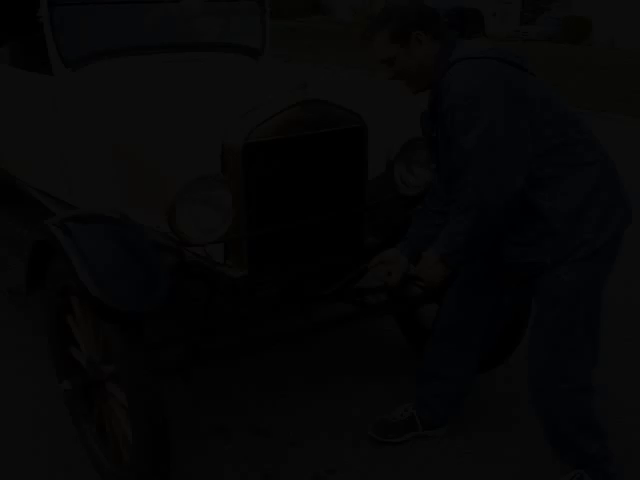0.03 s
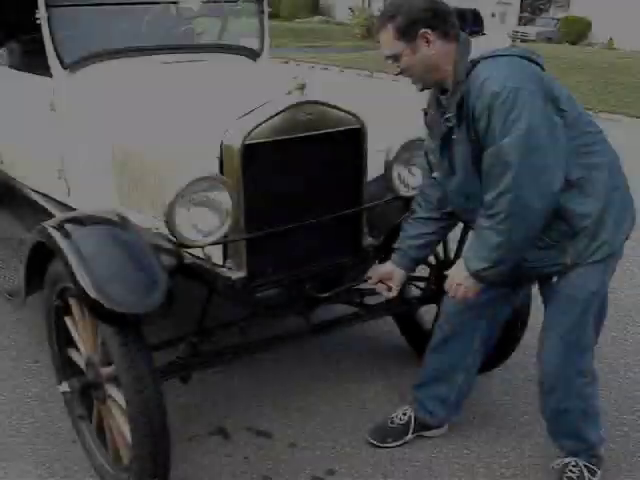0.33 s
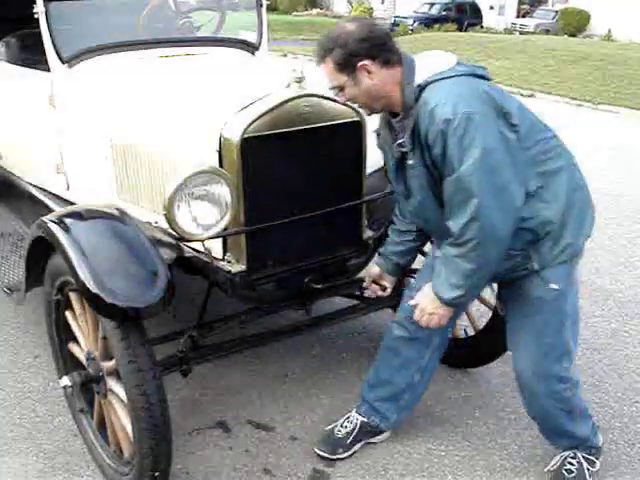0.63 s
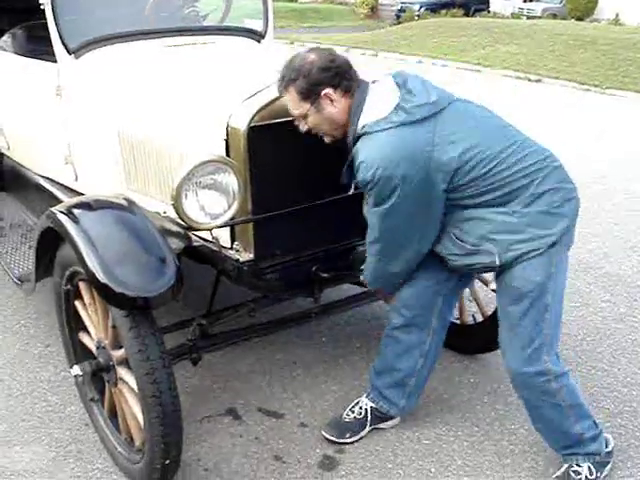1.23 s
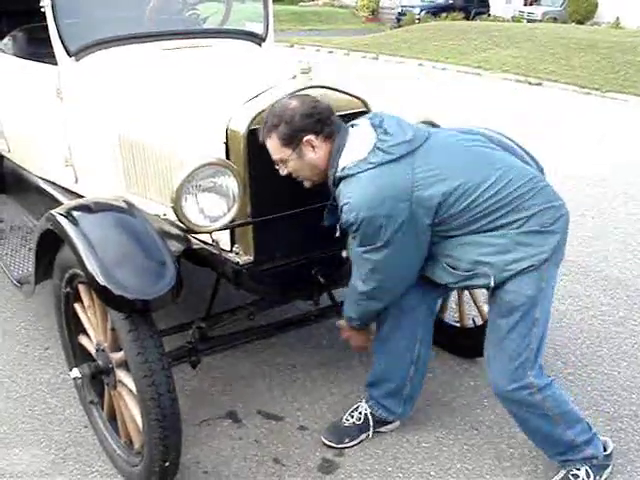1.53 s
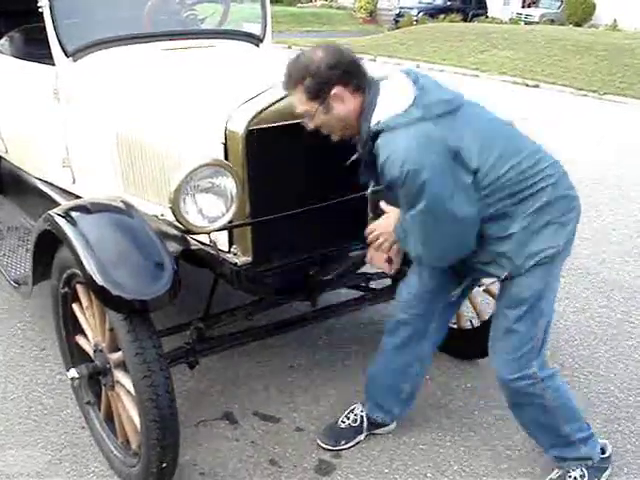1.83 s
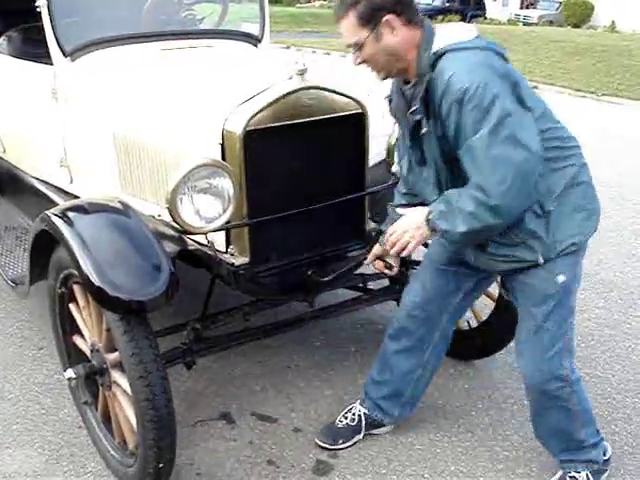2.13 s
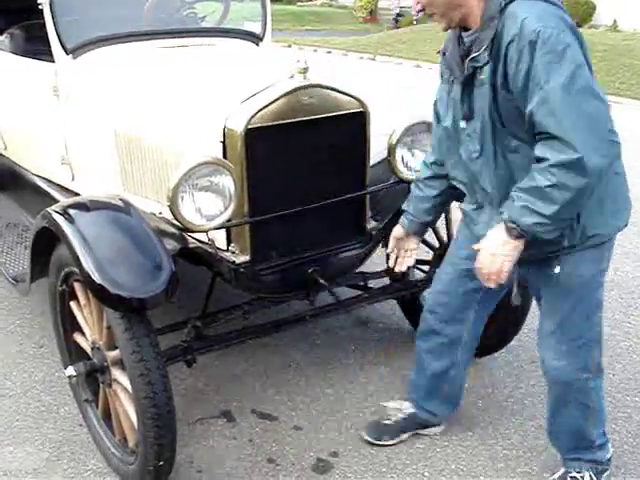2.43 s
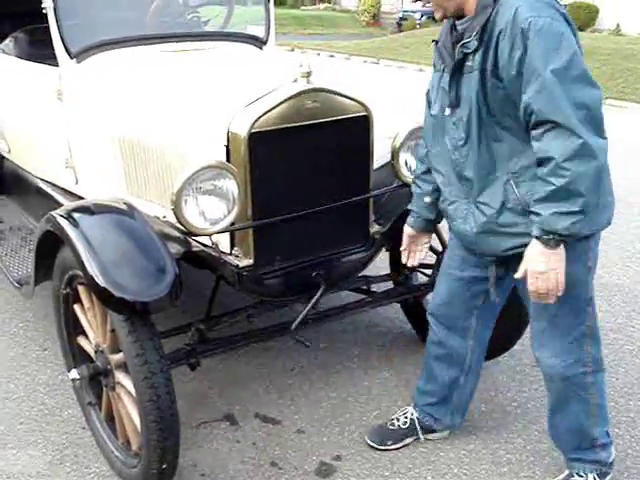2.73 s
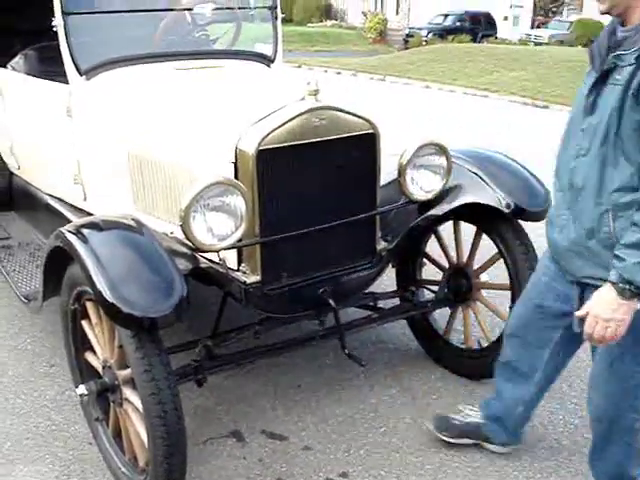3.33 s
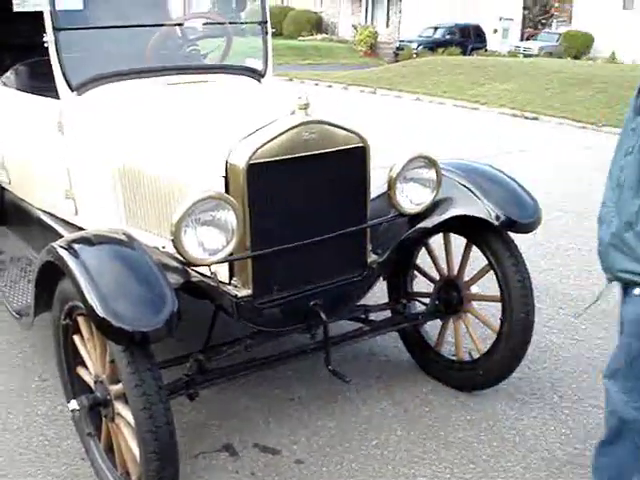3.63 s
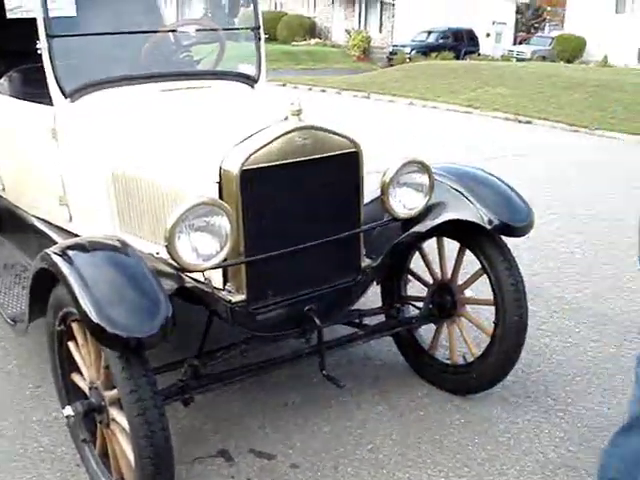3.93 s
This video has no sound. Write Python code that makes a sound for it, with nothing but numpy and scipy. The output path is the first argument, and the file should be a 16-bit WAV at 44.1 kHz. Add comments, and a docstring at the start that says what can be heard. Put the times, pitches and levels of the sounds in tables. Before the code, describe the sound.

An old car engine is hand cranked and starts a few metres away. The handle rattles, clunking at about 0.5 and 1 second. Near 1.6 seconds the shaft squeals and scrapes as the engine churns over. It catches with two sharp spits around 2.2 seconds, chirps near 2.7, and quickens into a dense tinny clatter with chuffing exhaust until 4 seconds. Faint distant traffic and hiss lie underneath.

```python
"""A quiet street: an antique four-cylinder car is hand cranked a few metres away.
The crank rattles into its socket and clunks against the frame; on the pull the dry shaft squeals
and gears and pistons churn over. The engine catches with two sharp spits, fires unevenly, then gathers
speed in a dense tinny clatter, each firing ringing the bonnet and chuffing from the exhaust.
Distant traffic and a faint hiss lie underneath."""
import sys
import numpy as np
from scipy import signal
from scipy.fft import rfft, irfft, next_fast_len
from scipy.io import wavfile
from scipy.ndimage import map_coordinates

SR = 44100
rng = np.random.default_rng(int(sys.argv[2]) if len(sys.argv) > 2 else 0)


def dump(signal):
    """Clip the signal to [-1, 1] and save it as 16-bit WAV at the path in sys.argv[1]."""
    limited = np.clip(np.atleast_2d(signal).T, -1, 1)
    pcm = np.round(limited * 32767).astype(np.int16)
    wavfile.write(sys.argv[1], SR, pcm)


N = 4 * SR

# resonances of block and bonnet: centre_hz, width_hz, lift_db
METAL_PEAKS = [(280, 45, 3), (650, 60, 6), (820, 50, 3), (960, 40, 3), (1090, 35, 4), (1552, 70, 5.5),
               (1720, 90, 3.5), (2434, 50, 4), (3554, 70, 5), (4016, 70, 4.5), (5642, 80, 4.5),
               (7037, 70, 5)]


def firings():
    """Each firing shakes out tinny clatter, rings the bonnet and chuffs from the exhaust."""
    # uneven at first, then closer: start_s, level_db, length_s
    kicks = [(1.669, -29.5, 0.0072), (1.837, -31.5, .021), (1.933, -25, .007), (2.04, -23, 0.019),
             (2.156, -19, 0.039), (2.263, -22.5, .034), (2.386, -32.5, 0.021), (2.473, -22, .028),
             (2.571, -20.5, 0.028), (2.657, -20.5, 0.021), (2.729, -30.5, .014), (2.803, -22.5, 0.024),
             (2.862, -22, 0.033), (2.918, -23, 0.029), (2.984, -24.5, .014), (3.033, -22, 0.026),
             (3.082, -21.5, 0.034), (3.151, -28, .021), (3.193, -20.5, 0.029), (3.238, -21, 0.018),
             (3.285, -23, .025), (3.33, -19.5, 0.018), (3.373, -27.5, .018), (3.414, -23, .016),
             (3.453, -23.5, 0.031), (3.498, -22, .018), (3.535, -24.5, .013), (3.574, -21, 0.024),
             (3.613, -23, 0.021), (3.653, -22.5, 0.012), (3.682, -22, 0.018), (3.72, -21.5, 0.019),
             (3.757, -19, 0.022), (3.796, -21.5, 0.019), (3.832, -24, .014), (3.87, -21, 0.02),
             (3.901, -22, 0.021), (3.94, -20, 0.015), (3.974, -23, 0.014)]
    # spectra: freq_hz, level_db
    clatter_spectrum = [(88, -45.5), (150, -10.5), (302, -9), (490, -18.5), (631, -4.5), (1090, -4),
                        (1340, -4), (2020, -7), (2310, -4), (3410, -6.5), (4650, -12.5), (7130, -14.5),
                        (12000, -29), (15500, -25)]
    exhaust_spectrum = [(30, -6.5), (80, -2.5), (115, 10), (150, 5.5), (270, 2), (400, 8), (700, -5.5),
                        (2000, -67)]
    bonnet_db, bonnet_t60_s = -9, 0.16
    exhaust_db, exhaust_lag_s = -12.5, 0.0075

    shake = bursts(kicks, rise_s=0.0015, t60_s=0.075) * amp(1.15 * wobble(170))
    clatter = shake * coloured(taps(per_s=1100, wash_db=2.5), clatter_spectrum, METAL_PEAKS)
    modes = [(hz, along(clatter_spectrum, hz) + lift_db, bonnet_t60_s) for hz, _, lift_db in METAL_PEAKS]
    bonnet = sum(ring(modes, s + length_s / 2, db + bonnet_db, rise_s=0.009) for s, db, length_s in kicks)
    chuffs = [(s + exhaust_lag_s, db + exhaust_db, length_s / 2) for s, db, length_s in kicks]
    exhaust = bursts(chuffs, rise_s=0.0037, t60_s=0.12) * coloured(noise(), exhaust_spectrum)
    return clatter + bonnet + exhaust


def churn():
    """Gears, valves and pistons rumble and tick while the shaft turns."""
    # time_s, bass_db, mid_db, treble_db
    levels = [(1.2, -88, -90, -90), (1.35, -71, -53, -66), (1.58, -74, -56, -57), (1.64, -51, -40, -47),
              (1.72, -44, -39, -43), (1.78, -38, -36.5, -36), (1.85, -38.5, -34.5, -27.5),
              (1.915, -36, -36, -35), (1.94, -27, -23, -33.5), (1.99, -28, -22, -24.5),
              (2.06, -27, -26, -27), (2.11, -32, -29, -30.5), (2.23, -31.5, -28.5, -28.5),
              (2.34, -51, -33.5, -31.5), (2.42, -35, -30, -31.5), (2.77, -35.5, -29.5, -29.5),
              (3.15, -39, -29.5, -29.5), (3.55, -34, -24.5, -25), (4, -32.5, -24.5, -26.5)]
    # spectra: freq_hz, level_db
    bass_spectrum = [(30, -29), (80, -10.5), (120, -9), (200, -2.5), (270, 1), (430, 3), (540, -0.5),
                     (800, -12.5), (2000, -72)]
    mid_spectrum = [(60, -48), (300, -13.5), (520, -8.5), (640, -3), (820, 1.5), (1150, -3.5), (1600, -4.5),
                    (2200, -18.5), (4000, -41), (12000, -88)]
    treble_spectrum = [(500, -57), (1500, 1), (2400, 3.5), (3600, -0.5), (5500, -3), (8000, -9.5),
                       (10000, -15), (12000, -22), (15500, -13)]

    bass_db, mid_db, treble_db = curves(levels)
    bass = amp(bass_db + 1.8 * wobble(50)) * coloured(noise(), bass_spectrum, METAL_PEAKS)
    mid = amp(mid_db + wobble(70)) * coloured(taps(per_s=900, wash_db=4), mid_spectrum, METAL_PEAKS)
    treble_gain = amp(treble_db + 1.33 * wobble(110))
    treble = treble_gain * coloured(taps(per_s=800, wash_db=1.5), treble_spectrum, METAL_PEAKS)
    return bass + mid + treble


def snaps():
    """Bright cracks of steel on steel, from the crank claw and the hardest kicks."""
    # start_s, level_db, length_s
    hits = [(.3, -48.5, 0.024), (.333, -43, .011), (.473, -48, 0.008), (.51, -32.5, 0.0063),
            (.537, -31, 0.01), (.725, -51, .008), (.966, -36, .0044), (1.189, -45.5, .008),
            (2.155, -18, 0.0053), (2.178, -22.5, 0.0091), (2.265, -18, 0.0067), (2.288, -22.5, 0.0071),
            (2.574, -24.5, .006), (2.802, -22.5, .01), (2.923, -20, 0.0081), (3.191, -19.5, 0.0061),
            (3.333, -26, 0.0056), (3.508, -24.5, .005)]
    # freq_hz, level_db
    spectrum = [(300, -17), (1200, -9.5), (2200, 1), (3400, 0), (5000, -3.5), (7500, -7.5), (9500, -13.5),
                (11500, -38), (15500, -17)]
    envelope = bursts(hits, rise_s=0.00039, t60_s=0.043)
    return envelope * coloured(taps(per_s=4800, wash_db=4), spectrum, METAL_PEAKS)


def spits():
    """The hardest jolts each push one slow wave of air: pressure, then suction."""
    # start_s, level_db, push_s
    jolts = [(2.157, -22, .04), (2.266, -24, .045), (2.577, -37, .035), (.966, -42, .006),
             (.537, -46, .008)]
    rise_s = 0.0025
    out = np.zeros(N)
    for start_s, db, push_s in jolts:
        t = np.maximum(clock() - start_s, 0)
        attack = 1 - np.exp(-t / rise_s)
        out += amp(db) * attack * (1 - t / push_s) * np.exp(-t / push_s)
    return out


def crank():
    """The loose handle rattles; its knocks crack, ring the frame and boom in the bodywork."""
    # blows on the frame: start_s, level_db, rise_s, crack_offset_db, favoured_hz
    knocks = [(0.506, -32.5, 0.012, -8, 1090), (.542, -27, 0.023, 2, 420), (.585, -38.5, 0.004, -4, 633),
              (.845, -38.5, 0.0026, -4.5, 450), (0.967, -26, 0.0056, 7, 366), (1.192, -49, 0.0046, -7, 985),
              (1.225, -43, 0.0036, -14, 715)]
    # pitch_hz, level_db, t60_s
    frame_modes = [(258, -6, .22), (361, -3, .25), (420, -2, .27), (530, -9, .15), (635, -3, .2),
                   (715, -7, .18), (910, -6, .15), (985, -6, .15), (1090, -5, .15), (1211, -4, .17),
                   (1486, -11, .15), (1690, -8, .12)]
    # start_s, level_db, length_s
    rattles = [(.166, -42, 0.054), (.249, -46, 0.035), (.3, -50.5, 0.055), (.397, -43.5, 0.011),
               (.425, -42, 0.016), (.472, -46, 0.045), (.502, -35, 0.039), (.537, -31.5, 0.032),
               (.725, -44.5, 0.046), (1.005, -35.5, 0.0048), (1.19, -39, 0.016), (1.215, -43.5, 0.031),
               (1.47, -48.5, 0.026)]
    # spectra: freq_hz, level_db
    boom_spectrum = [(100, -21), (375, 1.5), (520, -7), (640, -3.5), (1200, -12), (2000, -43)]
    rattle_spectrum = [(120, -26), (200, -7.5), (585, -9.5), (1090, -3), (1450, -13.5), (1680, -8),
                       (2020, -10), (3680, -16), (11800, -36.5), (15500, -30)]
    crack_spectrum = [(60, -1.5), (150, -20), (350, -6), (700, 2.5), (1150, -10), (1380, -5), (2000, -2),
                      (3000, -8.5), (5500, -22), (9000, -34), (15500, -23)]

    frame = sum(ring(frame_modes, s, db - 1, rise_s, hz) for s, db, rise_s, _, hz in knocks)
    boom = bursts([(s, db, 0) for s, db, *_ in knocks], rise_s=0.012, t60_s=0.24)
    boom *= coloured(noise(), boom_spectrum)
    rattle = bursts(rattles, rise_s=0.00045, t60_s=0.12)
    rattle *= coloured(taps(per_s=2000, wash_db=2), rattle_spectrum)
    crack = sum(bursts([(s, db + offset_db, 0)], rise_s / 2, t60_s=0.088)
                for s, db, rise_s, offset_db, _ in knocks)
    crack *= coloured(noise(), crack_spectrum)
    return frame + boom + rattle + crack


def squeal():
    """The dry shaft sings on the pull, sags as the engine takes over and chirps once more."""
    # time_s, pitch_hz, level_db
    contour = [(1.54, 1092, -72), (1.606, 1084, -50), (1.65, 1066, -33), (1.692, 1081, -28.5),
               (1.732, 1083, -37), (1.762, 1082, -31.5), (1.785, 1068, -32), (1.797, 1028, -35.5),
               (1.84, 1010, -42), (1.89, 990, -80), (2.6, 1090, -70), (2.645, 1095, -32), (2.68, 1102, -28),
               (2.71, 1095, -38), (2.76, 1090, -70)]
    pitch_hz, level_db = curves(contour)
    cycles = np.cumsum(pitch_hz + 7 * wobble(350)) / SR
    tone = np.sqrt(2) * np.sin(2 * np.pi * cycles)
    sounding = (clock() > contour[0][0]) & (clock() < contour[-1][0])
    return tone * amp(level_db + 1.1 * wobble(110)) * sounding


def scrape():
    """The dry bearing bites suddenly with a rough, high scrape."""
    # start_s, level_db, length_s
    bites = [(1.646, -41.5, 0.15)]
    # freq_hz, level_db
    spectrum = [(3200, -31), (3800, -5), (4350, -5.5), (5000, -28), (15500, -36)]
    # bearing resonances: centre_hz, width_hz, lift_db
    peaks = [(3810, 110, 9), (4290, 130, 8), (11030, 110, 24), (13180, 110, 26)]
    envelope = bursts(bites, rise_s=0.0015, t60_s=0.12) * amp(2.5 * wobble(200))
    return envelope * coloured(taps(per_s=1500, wash_db=-6), spectrum, peaks)


def echo(x):
    """Scatter from road, bodywork and houses; the bass lingers longest."""
    # freq_hz, t60_s
    decay_times = [(150, 0.81), (1000, 0.22), (4000, 0.11), (14000, 0.12)]
    hz, t, bins = signal.stft(rng.standard_normal(SR // 2), SR, nperseg=256)
    decay = amp(-60 * t / along(decay_times, hz)[:, None])
    _, tail = signal.istft(bins * decay, SR, nperseg=256)
    return signal.fftconvolve(x, tail / np.linalg.norm(tail))[:N]


def street():
    """A soft wash of distant traffic and a faint hiss."""
    # time_s, traffic_db, hiss_db
    levels = [(0, -55, -56), (.38, -51.5, -69), (.55, -37.5, -63), (.7, -53.5, -66), (.85, -47, -62),
              (1.1, -48, -56), (1.5, -49, -56.5), (4, -41, -56)]
    # spectra: freq_hz, level_db
    traffic_spectrum = [(25, -31), (50, -5), (75, 3.5), (110, -5), (200, 5.5), (320, 6.5), (520, 1.5),
                        (850, 4), (1300, -3.5), (1800, -9), (3000, -20), (15500, -60)]
    hiss_spectrum = [(500, -30), (1700, -0.5), (2500, 0), (4000, -3.5), (7500, -8.5), (10000, -15),
                     (12000, -19), (15500, -17)]
    traffic_db, hiss_db = curves(levels)
    traffic = amp(traffic_db + 0.22 * wobble(14.8)) * coloured(noise(), traffic_spectrum)
    return traffic + amp(hiss_db) * coloured(noise(), hiss_spectrum)


def ring(modes, start_s, db, rise_s, favoured_hz=None):
    """One blow on (pitch_hz, level_db, t60_s) modes; the contact point may favour a pitch."""
    favour_db, favour_octaves, scatter_db = 6, 0.2, 2.5
    out, t = np.zeros(N + SR), np.arange(SR // 2) / SR
    attack = 1 - np.exp(-t / rise_s)
    for hz, mode_db, t60_s in modes:
        if favoured_hz:
            mode_db += favour_db * np.exp(-(np.log2(hz / favoured_hz) / favour_octaves) ** 2)
        decay = amp(db + mode_db + rng.normal(0, scatter_db) - 60 * t / t60_s)
        tone = np.sin(2 * np.pi * (hz * t + rng.random()))
        out[round(start_s * SR):][:len(t)] += attack * decay * tone
    return out[:N]


def taps(per_s, wash_db):
    """Random small metal impacts on a wash of noise, rms 1."""
    hits = (rng.random(N) < per_s / SR) * np.sign(noise()) * amp(-0.5 * noise())
    return unit(unit(hits) + amp(wash_db) * noise())


def bursts(rows, rise_s, t60_s):
    """Attack-hold-release envelopes, summed in power."""
    power, t = np.zeros(N + SR), np.arange(SR // 2) / SR
    attack = 1 - np.exp(-t / rise_s)
    for start_s, db, length_s in rows:
        release = amp(db - 60 * np.maximum(t - length_s, 0) / t60_s)
        power[round(start_s * SR):][:len(t)] += (attack * release) ** 2
    return np.sqrt(power[:N])


def coloured(x, spectrum, peaks=()):
    """x through a causal filter with resonant peaks, rms 1."""
    size = 2 * next_fast_len(N // 2 + 8192)
    hz = np.fft.rfftfreq(size, 1 / SR)
    peaks_db = sum(lift_db / (1 + (2 * (hz - centre_hz) / width_hz) ** 2)
                   for centre_hz, width_hz, lift_db in peaks)
    cepstrum = irfft(np.log(amp(along(spectrum, hz) + peaks_db)))
    cepstrum[1:size // 2] *= 2  # fold to minimum phase
    cepstrum[size // 2 + 1:] = 0
    return unit(irfft(rfft(x, size) * np.exp(rfft(cepstrum)))[:N])


def lowpass(x, cutoff_hz):
    """Brick-wall low-pass."""
    size = next_fast_len(N + SR // 2)
    passband = np.fft.rfftfreq(size, 1 / SR) < cutoff_hz
    return irfft(rfft(x, size) * passband, size)[:N]


def wobble(knots_per_s):
    """Smooth random curve, rms near 1."""
    return map_coordinates(rng.standard_normal(N // 8), [clock() * knots_per_s], mode="wrap")


def curves(rows):
    """Each column after time_s, interpolated per sample."""
    time_s, *columns = np.transpose(rows)
    return [np.interp(clock(), time_s, column) for column in columns]


def along(points, hz):
    """(freq_hz, value) points interpolated on a log axis."""
    freq_hz, values = np.transpose(points)
    return np.interp(np.log(hz + 1), np.log(freq_hz + 1), values)


def noise():
    """White noise."""
    return rng.standard_normal(N)


def amp(db):
    """Decibels to gain."""
    return 10 ** (np.asarray(db) / 20)


def unit(x):
    """x at rms 1."""
    return x / np.sqrt(np.mean(x ** 2) + 1e-20)


def clock():
    """Sample times in seconds."""
    return np.arange(N) / SR


def scene():
    """The car in the street, in mono."""
    echo_db = -15
    car = crank() + snaps() + squeal() + scrape() + churn() + firings()
    mono = car + amp(echo_db) * echo(car) + spits() + street()
    return np.array([mono, mono])


def record(dry):
    """Fade-in and band limit."""
    fade_start_s, fade_s = 0.1, 0.48
    fade = np.clip((clock() - fade_start_s) / fade_s, 0, 1)
    return np.array([lowpass(x * fade, cutoff_hz=15900) for x in dry])


dry = scene()
out = record(dry)
dump(out)
```